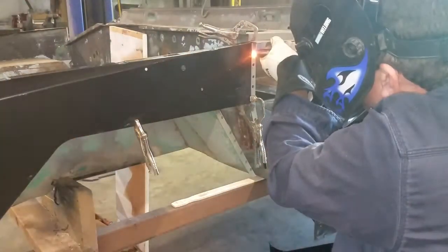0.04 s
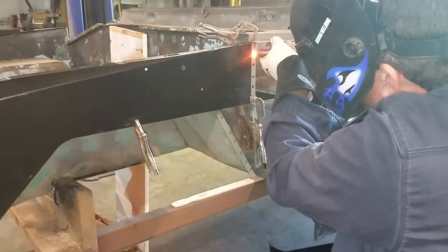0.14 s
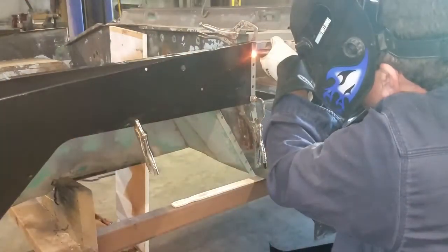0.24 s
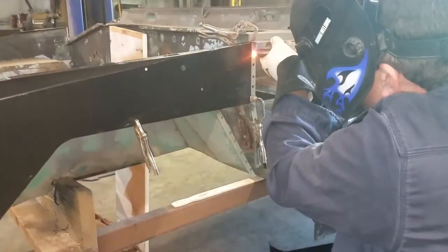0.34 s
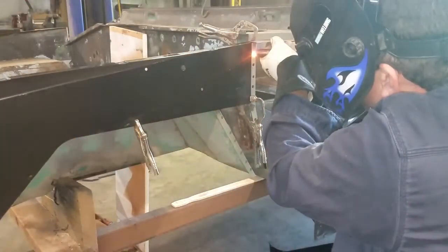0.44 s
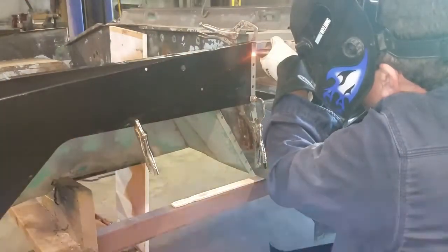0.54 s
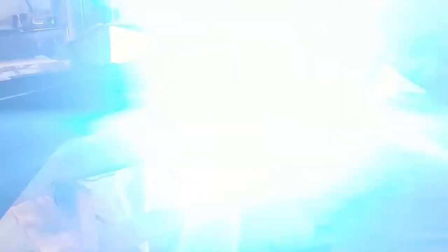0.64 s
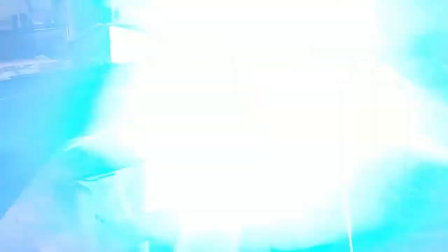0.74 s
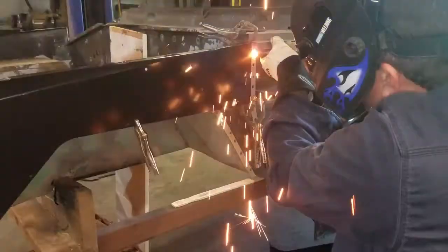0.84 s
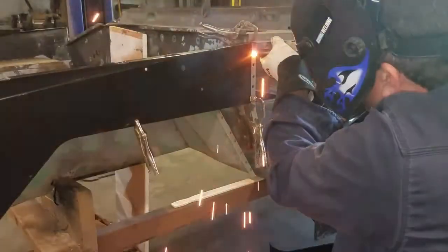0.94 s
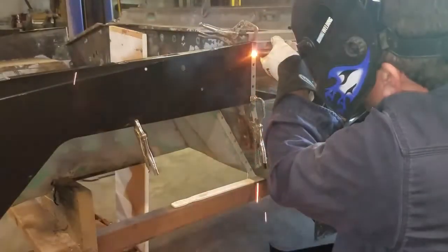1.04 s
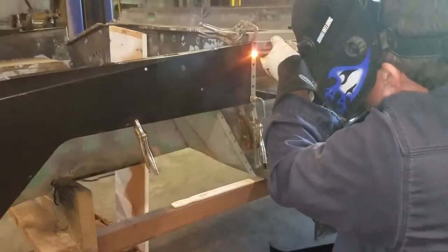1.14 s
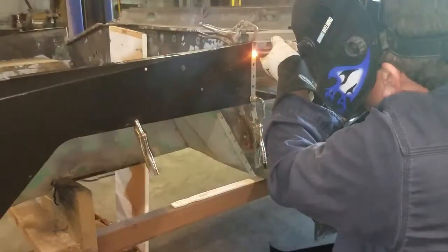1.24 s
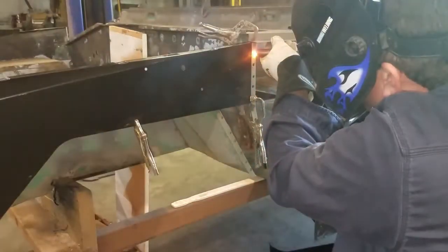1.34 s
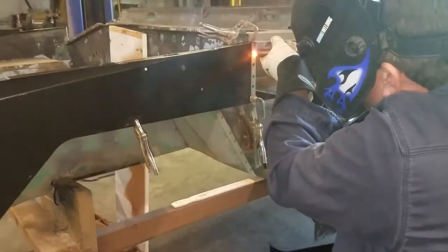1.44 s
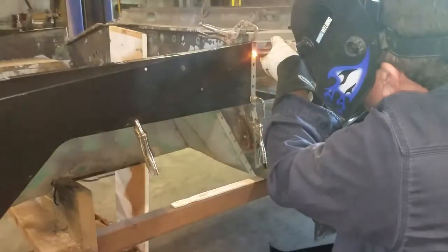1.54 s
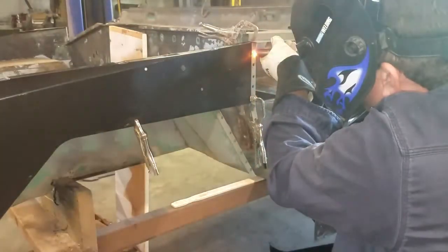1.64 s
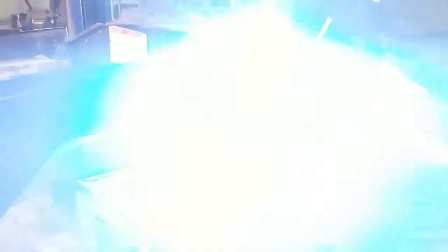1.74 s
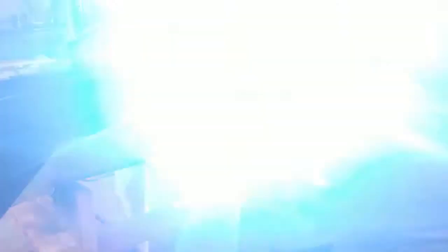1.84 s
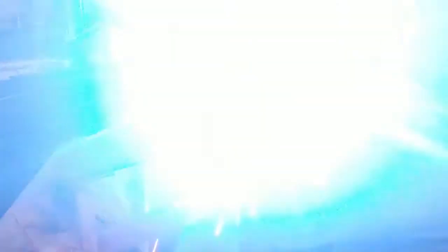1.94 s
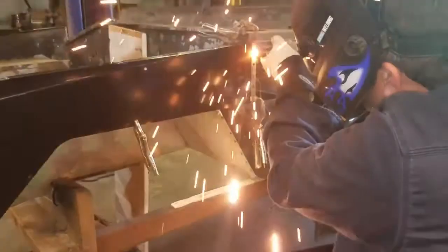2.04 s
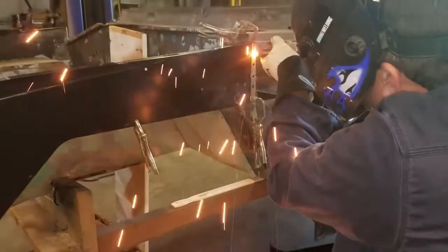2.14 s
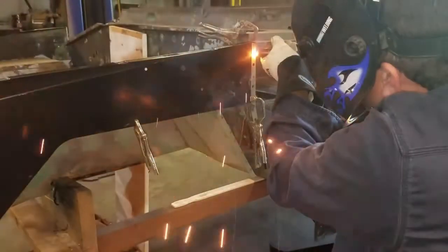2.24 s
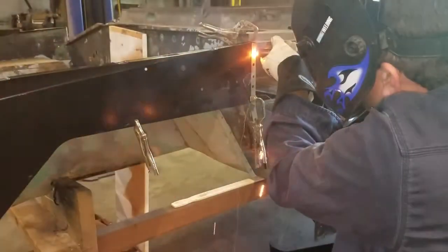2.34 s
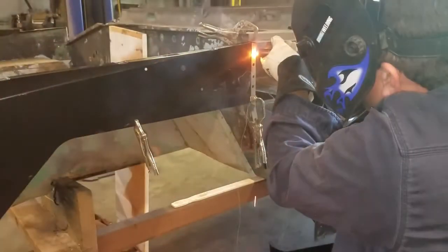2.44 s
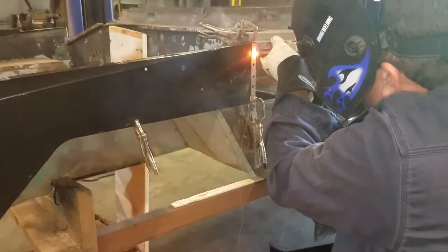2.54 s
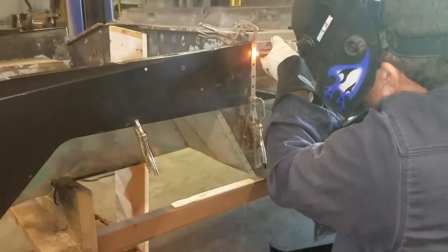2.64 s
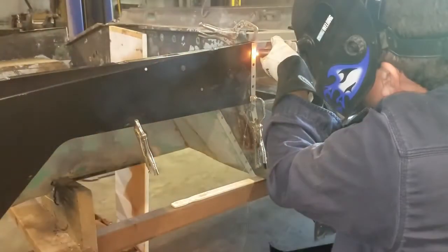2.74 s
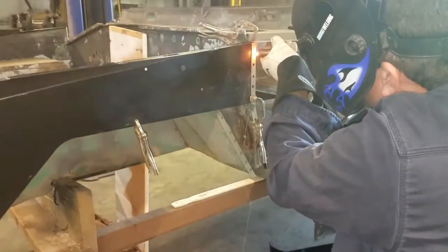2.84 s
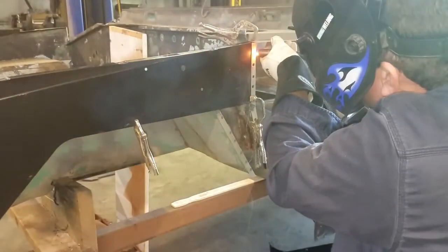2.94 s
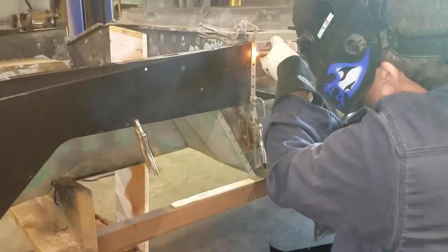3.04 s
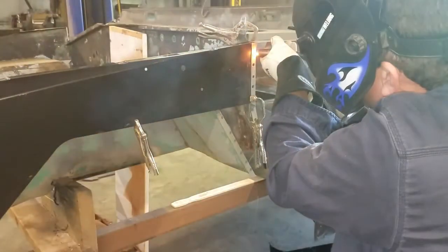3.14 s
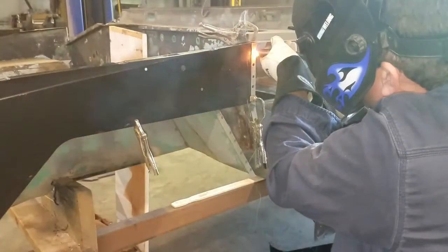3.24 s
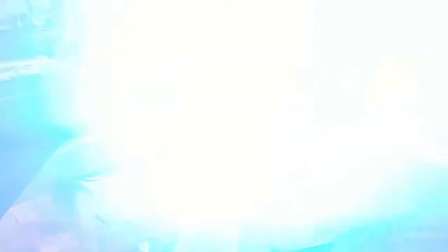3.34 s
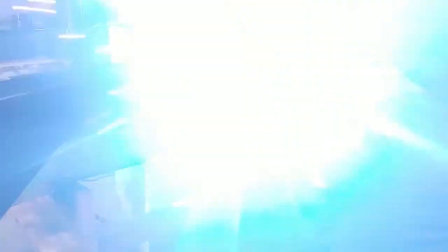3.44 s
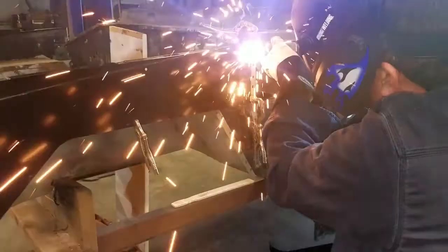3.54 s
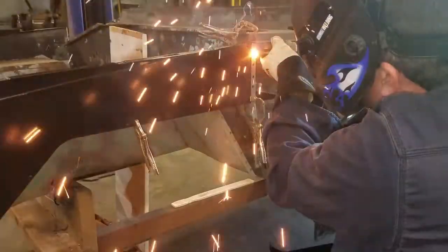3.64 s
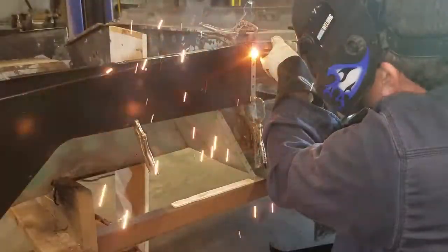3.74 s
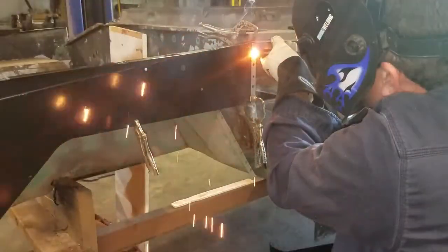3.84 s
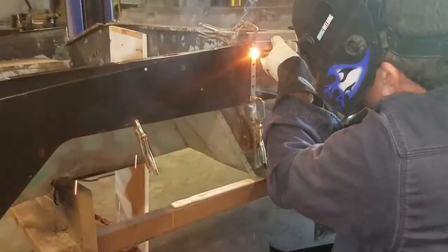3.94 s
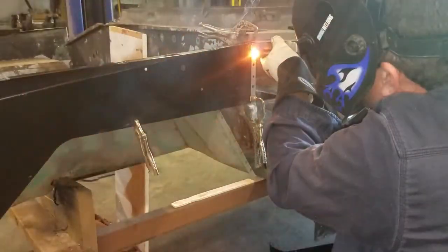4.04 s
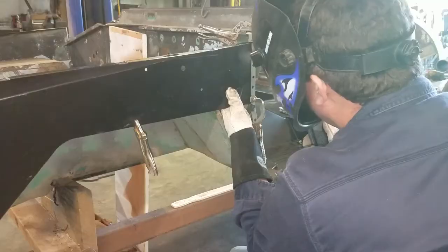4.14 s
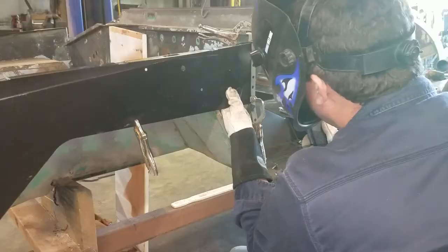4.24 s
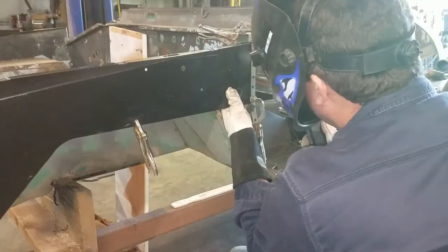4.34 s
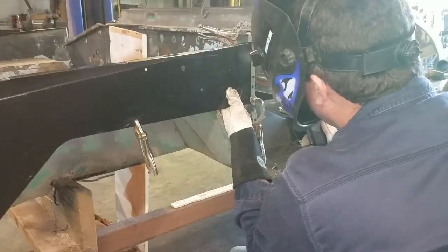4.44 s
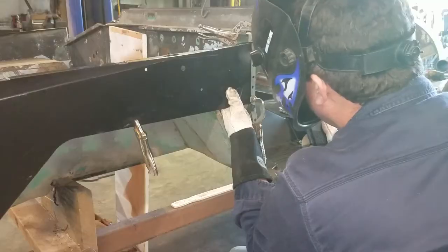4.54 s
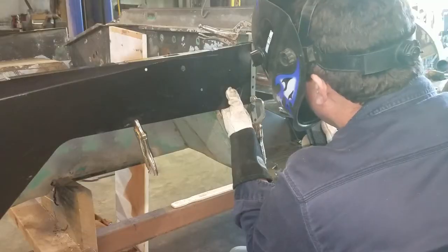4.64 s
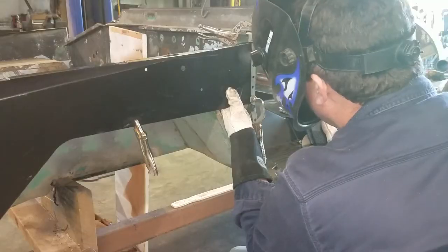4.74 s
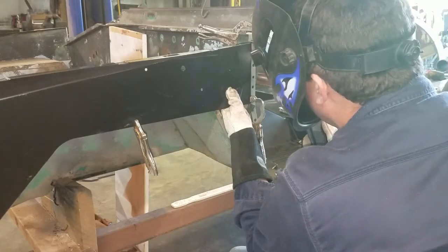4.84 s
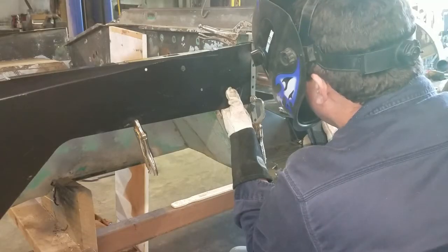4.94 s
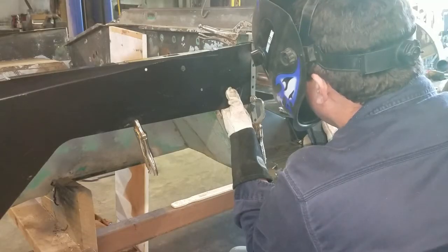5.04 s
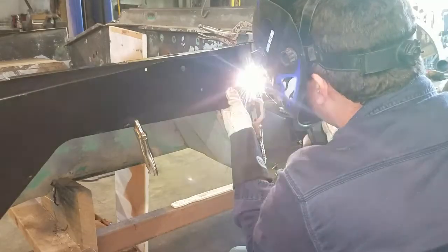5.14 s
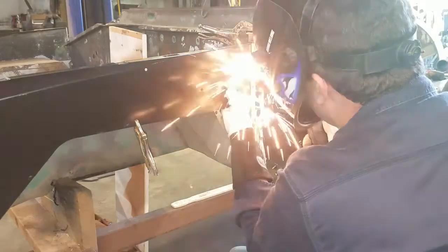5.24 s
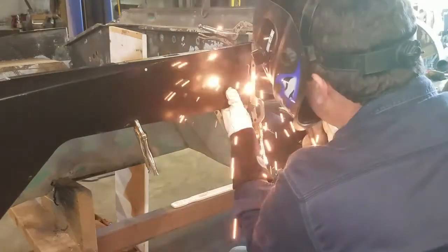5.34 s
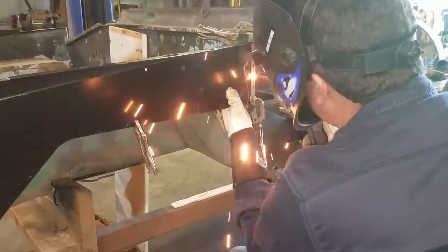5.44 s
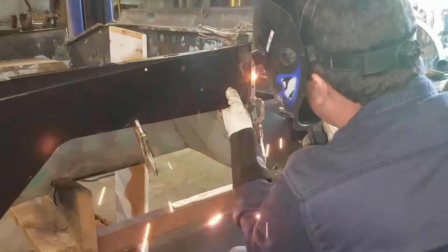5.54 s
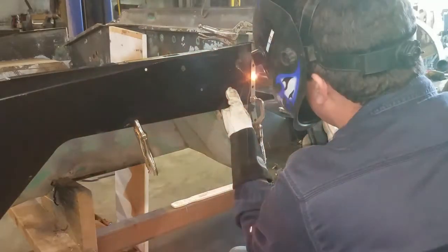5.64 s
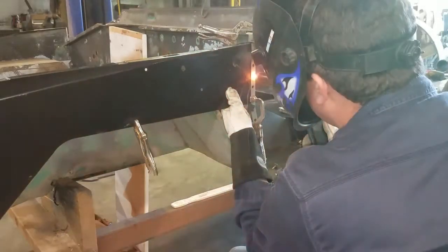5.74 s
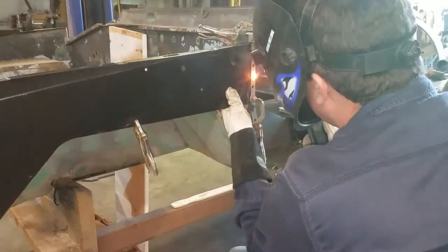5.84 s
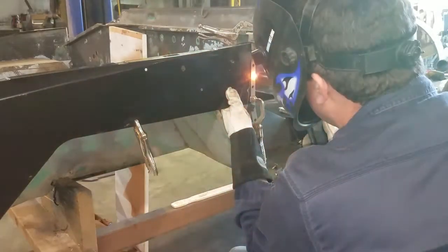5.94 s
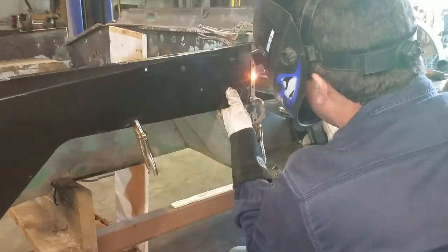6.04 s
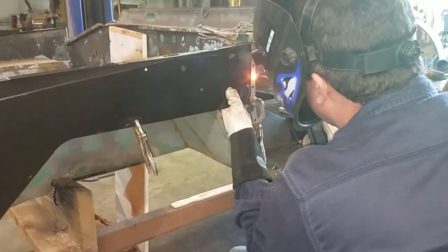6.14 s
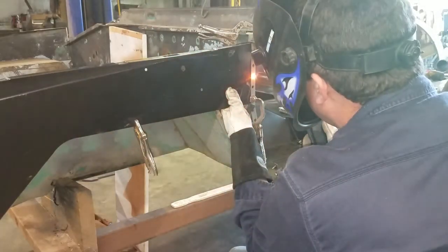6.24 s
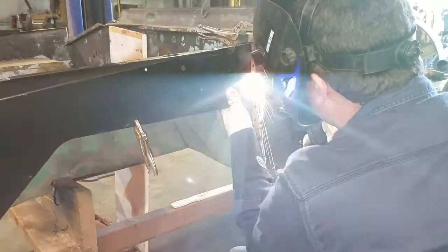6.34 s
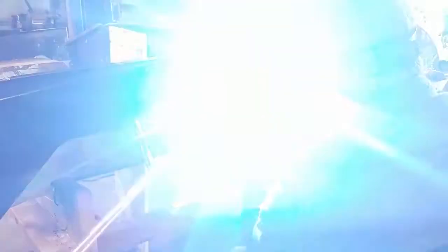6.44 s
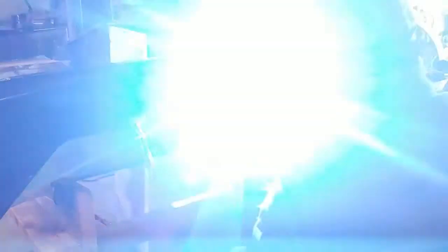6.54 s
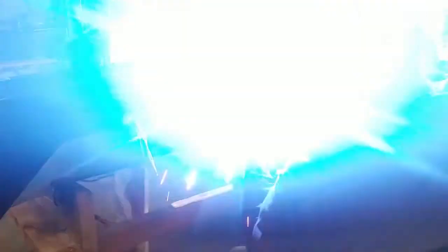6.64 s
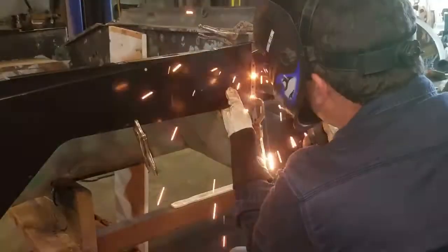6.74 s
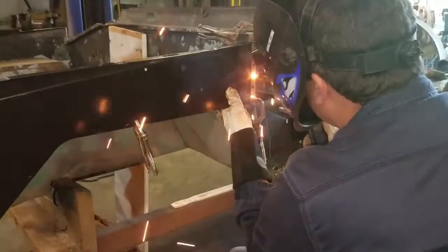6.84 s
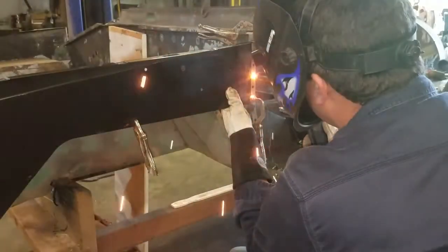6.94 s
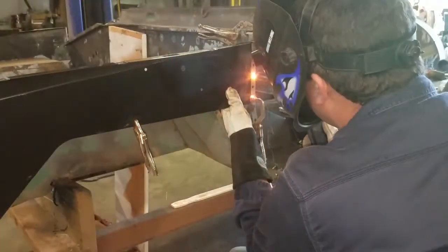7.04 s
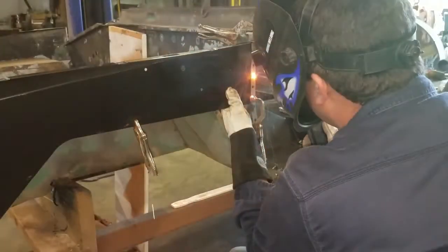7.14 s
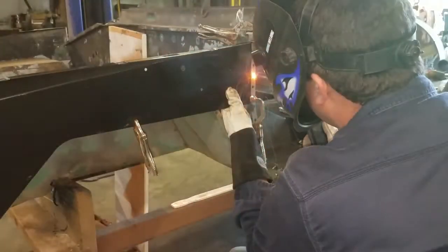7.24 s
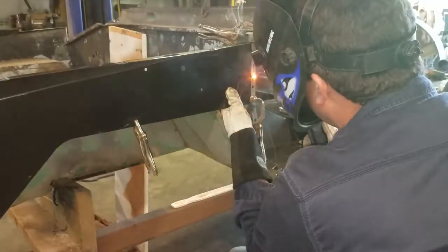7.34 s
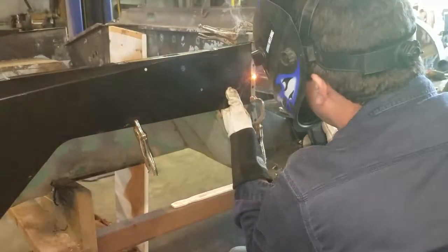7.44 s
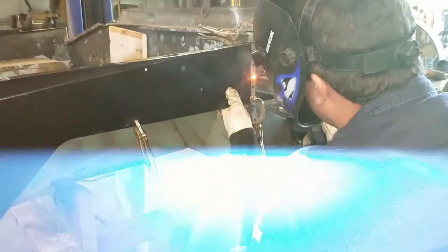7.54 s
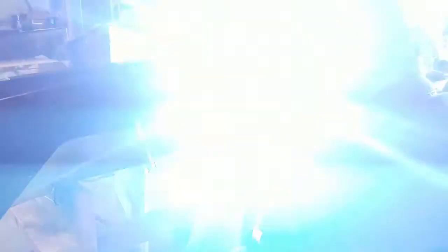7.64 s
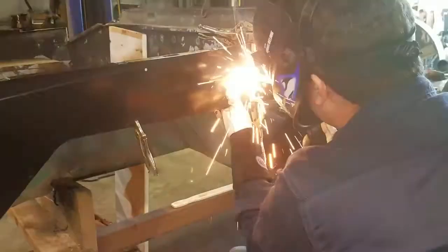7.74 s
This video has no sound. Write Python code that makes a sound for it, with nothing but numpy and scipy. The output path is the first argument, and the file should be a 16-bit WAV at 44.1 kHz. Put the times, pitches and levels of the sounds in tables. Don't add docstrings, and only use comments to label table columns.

```python
import sys
import numpy as np
from scipy import signal
from scipy.fft import rfft, irfft
from scipy.io import wavfile

SR = 44100
rng = np.random.default_rng(int(sys.argv[2]) if len(sys.argv) > 2 else 0)


def decibels_to_gain(level_db):
    exponent = np.asarray(level_db, float) / 20
    return 10 ** exponent


def unload_wav(signal):
    wavfile.write(
        sys.argv[1],
        SR,
        np.round(np.clip(np.atleast_2d(signal).T, -1, 1) * 32767).astype(np.int16),
    )


N = 343980

# (time [s], shock peak [dB], thump [dB], metal spray [dB])
DROPLETS = [(.6105, -6, -19, -13), (.6389, -7, -29, -23), (.684, -8, -27, -21), (.7015, -7, -30, -24),
            (.728, -7, -27, -20), (.7433, -7, -36, -22), (.7523, -6, -25, -18), (.771, -9, -28, -22),
            (1.8212, -6, -19, -19), (1.8431, -8, -20, -24), (1.8805, -9, -29, -25), (1.9177, -11, -27, -26),
            (1.9278, -11, -21, -21), (1.9344, -11, -14, -19), (3.3596, -6, -27, -25),
            (3.3694, -6, -23, -20), (3.3783, -10, -18, -22), (3.3873, -5, -14, -23), (3.4056, -5, -27, -30),
            (3.431, -7, -18, -25), (3.4376, -9, -27, -24), (3.4446, -7, -32, -23), (3.4692, -7, -25, -25),
            (3.503, -10, -30, -30), (5.2069, -3, -20, -15), (6.4337, -4, -22, -18), (6.4647, -10, -30, -23),
            (6.6008, -8, -32, -25), (6.6269, -8, -33, -24), (7.7288, -7, -27, -20)]


def rms_one(x):
    return x / np.sqrt(np.mean(x ** 2) + 1e-20)


def in_time(rows):
    s, *columns = np.transpose(rows)
    return [np.interp(np.arange(N) / SR, s, column) for column in columns]


def trigger_db(start, end):
    return in_time([(start - .004, -150), (start, 0), (end, 0), (end + .06, -150)])[0]


def at_hz(points, hz):
    table_hz, value = np.transpose(points)
    return np.interp(np.log(np.maximum(hz, 1)), np.log(table_hz), value)


def clicks(seconds, db):
    out = np.full(N, 1e-18)
    out[(np.asarray(seconds) * SR).astype(int)] = decibels_to_gain(db)
    return out


def fade(x, t60):
    return signal.lfilter([1], [1, -decibels_to_gain(-60 / (t60 * SR))], x)


def resonance(x, hz, width_hz):
    r = np.exp(-np.pi * width_hz / SR)
    gain = (1 - r * r) / 2
    return signal.lfilter([gain, 0, -gain], [1, -2 * r * np.cos(2 * np.pi * hz / SR), r * r], x)


def ring(x, hz, t60):
    r, w = decibels_to_gain(-60 / (t60 * SR)), 2 * np.pi * hz / SR
    return signal.lfilter([0, np.sin(w)], [1, -2 * r * np.cos(w), r * r], x)


def band(x, low_hz, high_hz):
    return signal.sosfilt(signal.butter(2, [low_hz, high_hz], "band", fs=SR, output="sos"), x)


def drift(rate_hz):
    r = np.exp(-2 * np.pi * rate_hz / SR)
    settled = signal.lfilter([1], [1, -2 * r, r * r], rng.standard_normal(N + SR))[SR:]
    return rms_one(settled)


def left_right(mid, side, alike):
    return np.sqrt(1 + alike) * mid + np.sqrt(1 - alike) * side * [[1], [-1]]


def pair(alike):
    mid, side = rng.standard_normal((2, N))
    return left_right(mid, side, alike) / np.sqrt(2)


def coloured(spectrum):
    # (frequency [Hz], left-right likeness [-1 to 1])
    likeness = [(60, 1), (180, 0.89), (550, 0.69), (1650, 0.16), (4970, -0.17), (15000, -0.17)]
    hz = np.arange(N // 2 + 1) * SR / N
    mid, side = rfft(rng.standard_normal((2, N)))
    both = left_right(mid, side, np.clip(at_hz(likeness, hz), -1, 1))
    return rms_one(irfft(both * decibels_to_gain(at_hz(spectrum, hz)), N))


def ducking():
    # (starts to sink [s], starts to recover [s], depth [dB])
    ducks = [
        (-1.2, -.2, -10),
        (.52, 1.3, -9.5),
        (1.7, 2.5, -12),
        (3.2, 4.1, -13),
        (5.05, 5.78, -9),
        (6.33, 7.17, -10),
        (7.53, 8.3, -10),
    ]
    lead_s, recover_s = .28, .23
    change_s = 4.118
    t, gain_db = np.arange(N) / SR, np.zeros(N)
    for sink, recover, depth_db in ducks:
        dip = np.clip((t - sink) / (recover - lead_s - sink), 0, 1)
        dip = dip * np.exp(-np.maximum(t - recover, 0) / recover_s)
        same_scene = (t < change_s) | (sink > change_s)
        gain_db = np.minimum(gain_db, depth_db * dip * same_scene)
    return gain_db


def background():
    # (frequency [Hz], level [dB per Hz])
    rumble = [(12, -44.5), (30, -19.5), (75, 1), (119, -3), (161, -7), (215, -15.5), (290, -33.5),
              (480, -120)]
    air = [(110, -35), (180, -13), (241, -13), (370, -7.5), (640, -12), (1500, -25.5), (1950, -55.5),
           (3300, -120)]
    hiss = [(5290, -50), (9000, -16.5), (11500, -6), (14700, 4.5), (15300, -0.5), (16000, -10)]
    wash = [(530, -32), (900, -1.5), (1210, -6.5), (2370, -4.5), (5000, -13), (7280, -13), (9500, -18),
            (12400, -49.5)]
    # (frequency [Hz], level [dB], share of the extra effort [1])
    hum_tones = [(119.5, 1.5, 1.05), (239, -4, .85), (359, -9, .3), (543, -13, .2), (598, -8, .2),
                 (858, -17, .3)]
    # (time [s], level over idle [dB])
    effort = [(4.113, 3), (4.123, 16), (5.6, 13.5), (6.15, 7.5), (6.35, 1), (6.8, 2.5)]
    gain_db, (effort_db,) = ducking(), in_time(effort)
    turn = 2 * np.pi * np.arange(N) / SR
    hum = sum(decibels_to_gain(db - 68.5 + share * effort_db) * np.sin(hz * turn) for hz, db, share in hum_tones)
    fan = decibels_to_gain(-68.5 + effort_db) * coloured(rumble)
    moving_air = decibels_to_gain(-68.5 + .25 * effort_db + (.7 - 1) * gain_db) * coloured(air)
    own_hiss = decibels_to_gain(-63.5) * coloured(hiss)
    outdoors = decibels_to_gain(-67 + .88 * gain_db) * coloured(wash)
    return decibels_to_gain(gain_db) * (fan + moving_air + hum + own_hiss) + outdoors


def bird():
    # (time [s], length [s], first pitch [Hz], last pitch [Hz], level [dB])
    single_notes = [(2.7, .04, 3950, 4150, -76), (2.8, .07, 2400, 2050, -71), (2.94, .18, 2450, 3400, -67),
                    (3.115, .04, 5200, 4600, -73), (3.13, .045, 3800, 4300, -68),
                    (4.116, .025, 2400, 2650, -63), (4.116, .06, 3400, 3850, -63),
                    (4.19, .05, 2120, 1950, -72), (7.29, .07, 3950, 4200, -79),
                    (7.37, .09, 2520, 2050, -74)]
    # (start [s], level [dB])
    calls = [(.0, -64.5), (.275, -64), (.82, -70), (1.1, -74), (1.375, -72.5), (4.29, -62.5),
             (4.565, -66.5)]
    # (delay [s], length [s], first pitch [Hz], last pitch [Hz], level [dB])
    call_notes = [(.0, .045, 1750, 2050, -6), (.033, .075, 2050, 2680, 3), (.094, .03, 3050, 4050, -3),
                  (.102, .075, 3700, 3760, -1), (.215, .045, 2120, 1950, -10)]
    out, warble = np.zeros(N), 1 + .014 * drift(90)
    notes = list(single_notes)
    for s, call_db in calls:
        notes += [(s + delay, *shape, db + call_db) for delay, *shape, db in call_notes]
    for s, length, first_hz, last_hz, db in notes:
        i, t = int(s * SR), np.arange(int(length * SR)) / SR
        glide = np.exp(-t / .023)
        hz = (last_hz + (first_hz - last_hz) * glide) * warble[i:i + len(t)]
        swell = np.sin(np.pi * (t / length) ** .48) ** .6
        out[i:i + len(t)] += decibels_to_gain(db) * swell * np.sin(2 * np.pi * np.cumsum(hz) / SR)
    return out * decibels_to_gain(2 * drift(60))


def workshop(x):
    # (frequency [Hz], t60 [s])
    room_t60 = [(60, 0.13), (250, 0.45), (1000, 0.29), (4000, 0.38), (8000, 0.41), (15000, 0.45)]
    t, edges = np.arange(SR) / SR, 40 * 2 ** np.arange(9.5)
    echo = np.zeros((2, SR))
    for low, high in zip(edges, edges[1:]):
        octave = band(rng.standard_normal((2, SR)), low, min(high, 20000))
        echo += octave * decibels_to_gain(-60 * t / at_hz(room_t60, low * np.sqrt(2)))
    echo = echo * np.clip((t - .002) / .007, 0, 1)
    echo = echo / np.sqrt(np.sum(echo ** 2, axis=1, keepdims=True))
    return signal.fftconvolve(x[None], echo, axes=1)[:, :N]


def port(x):
    # (frequency [Hz], width [Hz], boost or cut [dB])
    port_modes = [(3120, 920, 1), (5630, 2700, -2.5), (7870, 1000, 6), (9300, 1200, -5.5),
                  (13500, 8500, 2.5)]
    for hz, width, db in port_modes:
        x = x + (decibels_to_gain(db) - 1) * resonance(x, hz, width)
    return x


def panel():
    # (time [s], level [dB])
    hits = [(.771, -71), (1.934, -70), (3.53, -74), (5.207, -66), (6.635, -61)]
    # (frequency [Hz], t60 [s], level [dB])
    sheet = [(958, 1.6, 0), (355, .8, 2)]
    blows = clicks(*np.transpose(hits))
    return sum(decibels_to_gain(db) * ring(blows, hz, t60) for hz, t60, db in sheet)


def ticks():
    # (time [s], peak [dB])
    tick_times = [(2.306, -45.5), (2.41, -67), (2.42, -70), (2.555, -70)]
    s, db = np.transpose(tick_times)
    tap = band(fade(clicks(s, db + 2), .0072) * pair(.54), 300, 3200)
    return tap + ring(clicks(s, db - 2), 565, .009)


def contactor():
    # (time [s], peak [dB])
    clacks = [(0.517, -23.5), (1.692, -33), (3.194, -24.5), (5.047, -24), (6.323, -26.5), (7.522, -26.5)]
    releases = [(0.836, -41.5), (1.989, -46), (3.62, -43.5), (5.289, -37), (6.69, -39.5)]
    # (frequency [Hz], width [Hz], level [dB])
    case = [(420, 200, -13), (720, 200, -8), (1060, 500, 1.5), (1866, 400, 1), (2560, 400, 1.5),
            (2700, 600, -12), (4050, 370, -9.5), (7400, 830, -19.5), (13200, 1500, -9)]
    s, db = np.transpose([*clacks, *releases])
    armature = clicks(s, db)
    chatter = (fade(armature, .16) - fade(armature, .0037)) * pair(.94)
    out = 0
    for hz, width, level_db in case:
        out = out + decibels_to_gain(level_db - 3.5) * resonance(chatter, hz, width) * np.sqrt(SR / width) / 3
    return out


def gas():
    # (start [s], end [s], gas [dB], whistle [dB], wire feed [dB])
    pulls = [(0.516, 0.788, -37.5, -39.5, -51.5), (1.692, 1.949, -38.5, -41.5, -45),
             (3.192, 3.547, -39.5, -41.5, -48), (5.049, 5.3, -38, -42, -42), (6.322, 6.66, -43, -45, -48),
             (7.524, 7.778, -41, -43, -41)]
    # (frequency [Hz], width [Hz], level [dB])
    nozzle = [(6350, 600, 0), (3300, 450, -6)]
    hiss, whistle, feed = np.zeros((3, N))
    for start, end, gas_db, whistle_db, feed_db in pulls:
        held_db = trigger_db(start, end)
        hiss += decibels_to_gain(held_db + gas_db)
        feed += decibels_to_gain(held_db + feed_db)
        flow = in_time([(start + .02, 0), (start + .05, 1), (end, 1), (end + .02, 0)])[0]
        whistle += decibels_to_gain(whistle_db) * flow
    white, tones = pair(.84), 0
    for hz, width, db in nozzle:
        tones = tones + decibels_to_gain(db) * rms_one(resonance(resonance(white, hz, width), hz, width))
    grind = rms_one(band(pair(.92), 290, 900)) * decibels_to_gain(drift(30))
    return hiss * rms_one(band(pair(.21), 570, 12000)) + whistle * tones + feed * grind


def gusts():
    # (time [s], left [dB], right [dB])
    shoves = [(.611, -25, -31.5), (.728, -33, -30), (1.821, -29, -40), (1.843, -31.5, -28.5),
              (1.934, -22.5, -33.5), (3.329, -23.5, -26), (3.378, -18.5, -11), (3.388, -28, -25.5),
              (3.41, -26.5, -35), (5.207, -14.5, -15), (6.434, -37, -42.5)]
    s, left_db, right_db = np.transpose(shoves)
    s = s - .005
    left, right = clicks(s, left_db + 40.5), clicks(s, right_db + 39.5)
    return band(band([left, .5 * left - right], 30, 230), 30, 230)


def fizz(shorts):
    # (start [s], end [s], level [dB])
    stretches = [(6.373, 6.65, -36.5), (7.583, 7.796, -44)]
    level = sum(decibels_to_gain(db + trigger_db(start, end)) for start, end, db in stretches)
    s, spray_db = shorts[0], shorts[3]
    flung = 1 + fade(clicks(s, spray_db + 43), .007)
    return level * flung * decibels_to_gain(5.7 * drift(80)) * rms_one(band(pair(.86), 12000, 17000))


def arc():
    # (time [s], sizzle [dB])
    burns = [
        [(.59, -31.5), (.62, -19.5), (.7, -29.5), (.78, -30)],
        [(1.772, -27.5), (1.81, -33), (1.825, -32), (1.94, -24.5)],
        [(3.33, -19.5), (3.4, -31.5), (3.46, -40.5), (3.535, -48)],
        [(5.168, -31), (5.197, -51), (5.21, -23.5), (5.245, -26.5)],
        [(6.377, -26.5), (6.42, -34), (6.44, -33), (6.53, -48.5), (6.575, -42), (6.6, -31), (6.65, -33.5)],
        [(7.585, -30), (7.64, -65), (7.68, -32), (7.75, -49), (7.79, -46)],
    ]
    # (time [s], half length [s], hiss [dB], roar [dB])
    flares = [(0.597, 0.0017, -23, -55), (1.779, 0.023, -62, -33), (1.945, 0.0089, -27, -34.5),
              (3.33, 0.01, -55.5, -27.5), (3.401, 0.0052, -13, -50.5), (3.523, 0.0031, -30, -52),
              (5.09, .012, -56.5, -30), (5.131, .008, -60.5, -40), (5.171, 0.0053, -35, -49),
              (5.197, 0.016, -58.5, -26), (5.22, 0.0049, -27.5, -52.5), (6.389, 0.021, -33.5, -31.5),
              (6.468, 0.032, -23, -39), (6.578, 0.0031, -40.5, -63), (7.575, 0.0065, -53, -34),
              (7.595, 0.016, -38.5, -29), (7.665, 0.011, -15, -64), (7.709, 0.0039, -20, -56),
              (7.739, 0.018, -24.5, -33.5)]
    sizzle, roar, t = np.zeros(N), np.zeros(N), np.arange(N) / SR
    for weld in burns:
        lit, out = weld[0][0] - .01, weld[-1][0] + .08
        sizzle += decibels_to_gain(in_time([(lit, -200), *weld, (out, -200)])[0])
    for s, half, hiss_db, roar_db in flares:
        near = slice(int((s - .06) * SR), int((s + .06) * SR))
        bell = np.exp(-((t[near] - s) / half) ** 2)
        sizzle[near] += decibels_to_gain(hiss_db - 6) * bell
        roar[near] += decibels_to_gain(roar_db - 1) * bell
    flicker = decibels_to_gain(3 * drift(150) + 1.5 * np.sin(2 * np.pi * 120 * t))
    bright = rms_one(band(pair(.5) * flicker, 1500, 21000))
    return sizzle * bright + roar * rms_one(band(pair(.55), 250, 1200))


def restrikes():
    # (first [s], last [s], gap [s], shock peak [dB])
    buzz = [(.6389, .71, .0105, -14), (1.8355, 1.9177, .0093, -13), (3.4056, 3.5305, .0083, -14),
            (6.4852, 6.5243, .0078, -14), (6.5926, 6.6349, .0083, -13), (7.6783, 7.6973, .009, -14)]
    jitter_s, spread_db = .0008, 1.6
    big, rows = np.array(DROPLETS)[:, 0], []
    for first, last, gap, db in buzz:
        between = big[(big > first + gap / 2) & (big < last - gap / 2)]
        marks = [first, *between, last]
        s = np.concatenate([np.linspace(a, b, max(round((b - a) / gap), 1) + 1)
                            for a, b in zip(marks, marks[1:])])
        rows += [(t, db) for t in np.unique(s) if np.min(abs(big - t)) > gap / 4]
    s, db = np.transpose(rows)
    luck = rng.standard_normal((4, len(rows)))
    shock_db = db - 2.94 + spread_db * luck[1]
    thump_db = shock_db - 18.5 + 2 * spread_db * luck[2]
    spray_db = shock_db - 12.5 + 2 * spread_db * luck[3]
    return np.transpose([s + jitter_s * luck[0], shock_db, thump_db, spray_db])


def all_shorts():
    # (time [s], shock peak [dB], thump [dB],
    # metal spray [dB])
    strikes = [(.5876, -12, -33, -23), (1.7698, -7, -28, -21), (3.3284, -3, -20, -13),
               (5.1708, -17, -42, -22), (5.2095, -6, -28, -20), (6.3754, -6, -23, -17),
               (7.5834, -8, -36, -24)]
    return np.transpose([*strikes, *DROPLETS, *restrikes()])


def pops(shorts):
    s, shock_db, thump_db, spray_db = shorts
    shock = resonance(clicks(s, shock_db + 15), 1700, 5000)
    suction = -ring(clicks(s + .00006, thump_db + 12), 440, .0034)
    burst = fade(clicks(s + .0001, spray_db + 8.5), .0061)
    tail = fade(clicks(s, spray_db - 10.5), .06)
    spray = (burst + tail) * pair(1.0)
    return band(shock + suction, 250, 18000) + band(spray, 900, 18000)


def scene():
    shorts = all_shorts()
    torch = pops(shorts) + arc() + fizz(shorts) + gas() + ticks()
    torch[0] = np.roll(torch[0], 1)
    relay, song, shove = contactor(), bird(), gusts()
    into_room = decibels_to_gain(-6) * torch.mean(axis=0) + decibels_to_gain(-2.5) * relay.mean(axis=0) + 2 * song
    into_room = into_room + decibels_to_gain(-2) * band(shove[0], 110, 330)
    at_port = torch + relay + panel() + workshop(into_room) + .5 * song
    return port(at_port) + shove + background()


def roll_off(x):
    return signal.sosfilt(signal.butter(12, 17150, fs=SR, output="sos"), x)


def record(dry):
    rounded = .7 * np.tanh(dry / .7)
    steep = signal.ellip(10, .5, 50, 15850, fs=SR, output="sos")
    mix = signal.sosfilt(steep, rounded)
    return roll_off(mix)


dry = scene()
out = record(dry)
unload_wav(out)
```